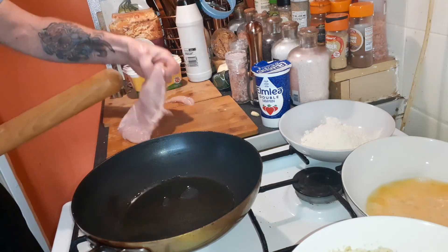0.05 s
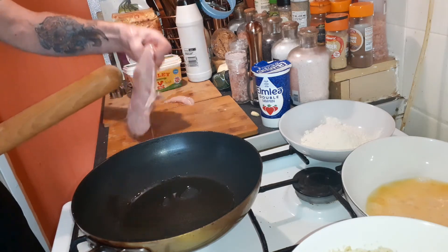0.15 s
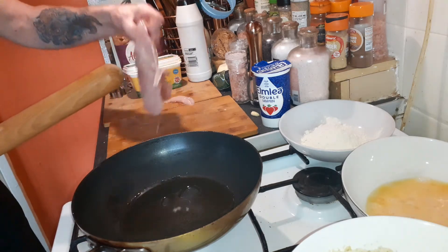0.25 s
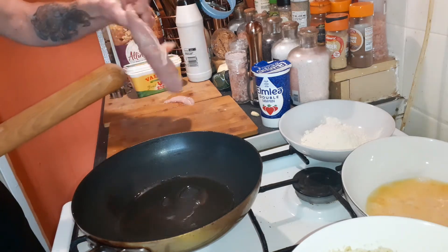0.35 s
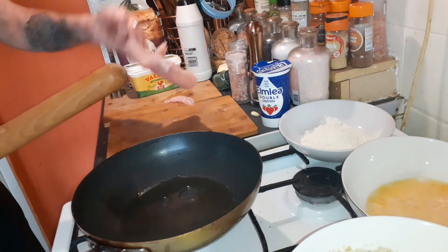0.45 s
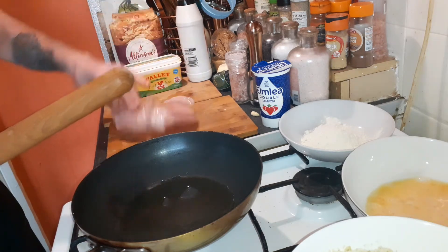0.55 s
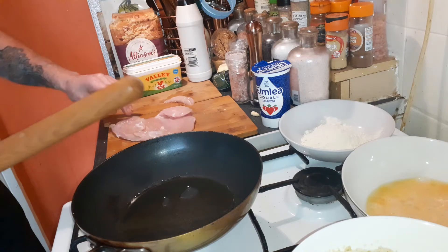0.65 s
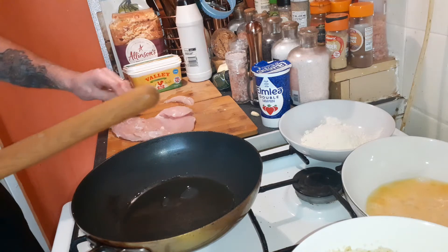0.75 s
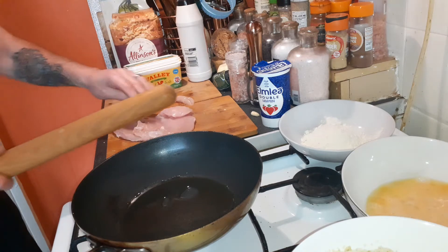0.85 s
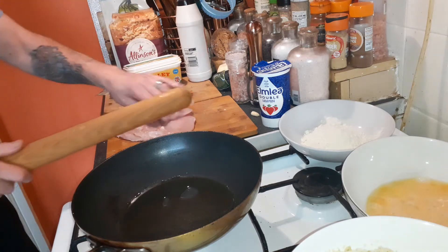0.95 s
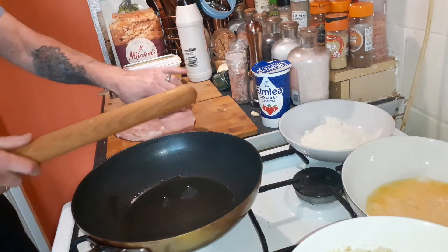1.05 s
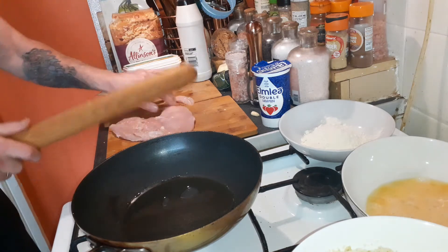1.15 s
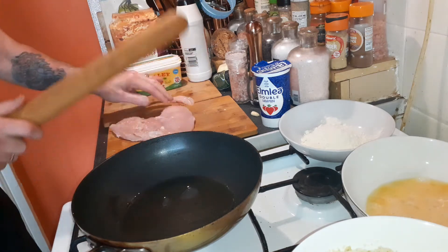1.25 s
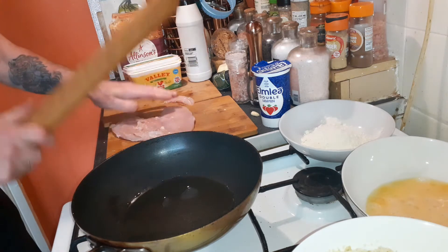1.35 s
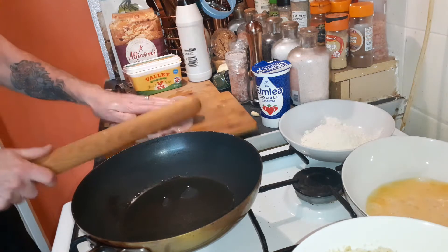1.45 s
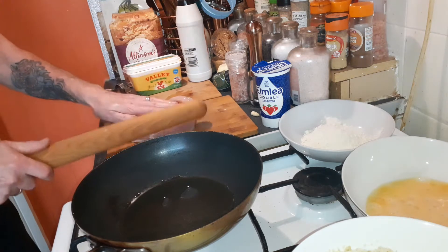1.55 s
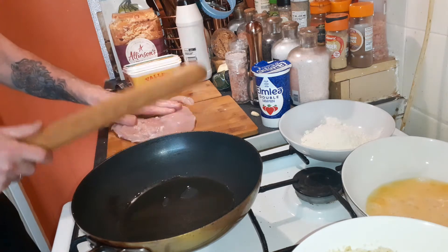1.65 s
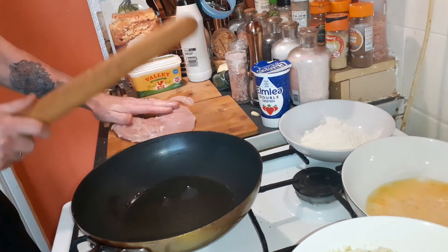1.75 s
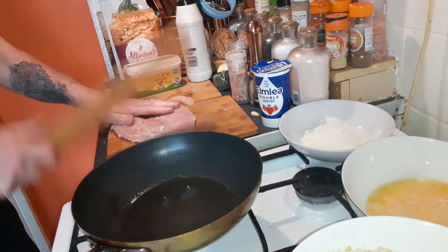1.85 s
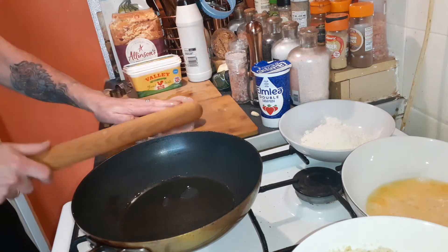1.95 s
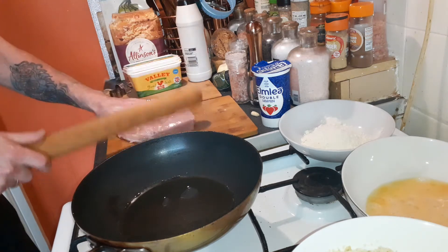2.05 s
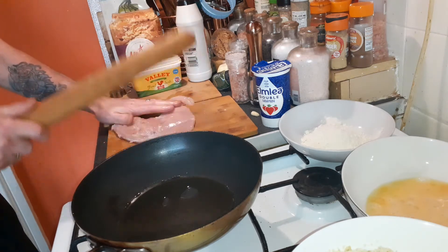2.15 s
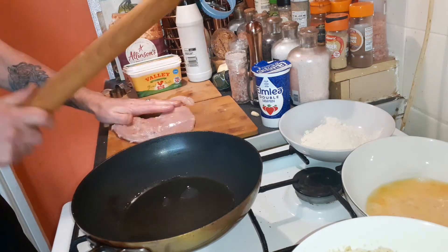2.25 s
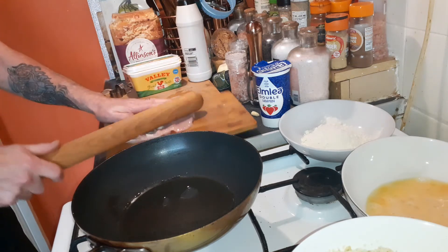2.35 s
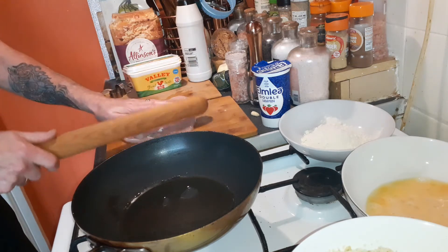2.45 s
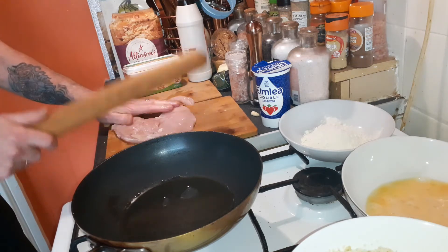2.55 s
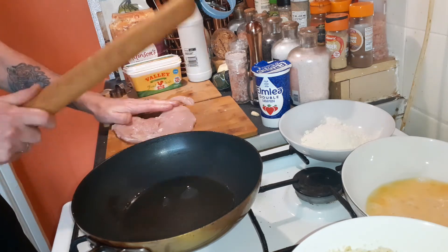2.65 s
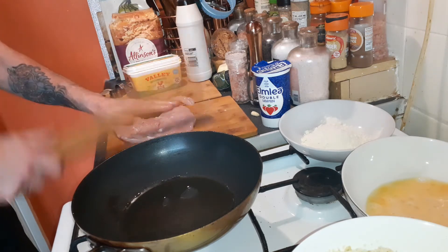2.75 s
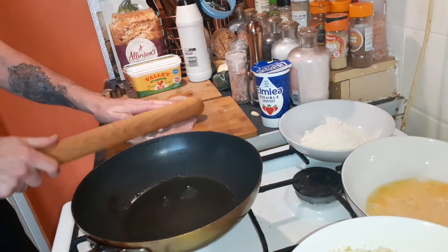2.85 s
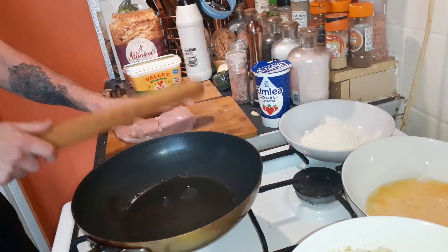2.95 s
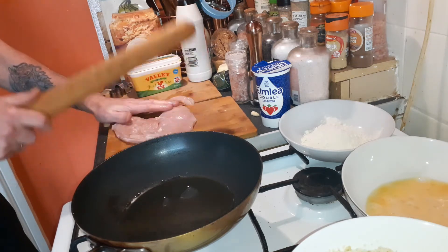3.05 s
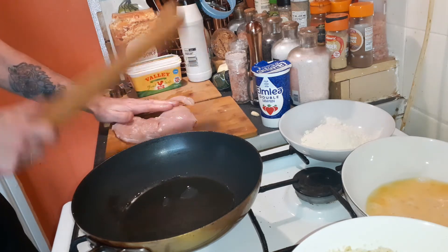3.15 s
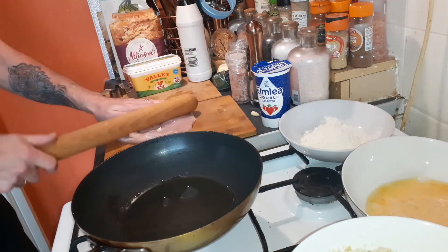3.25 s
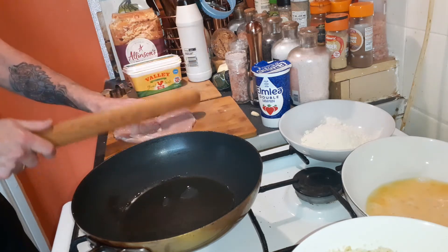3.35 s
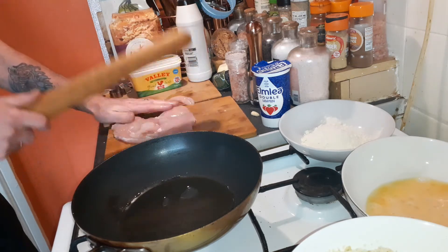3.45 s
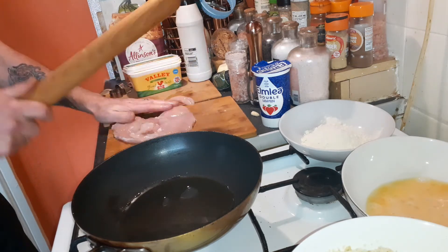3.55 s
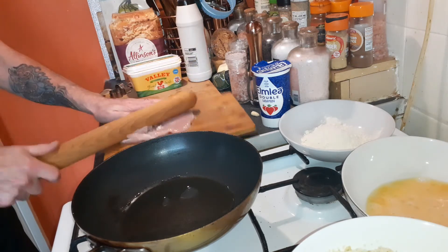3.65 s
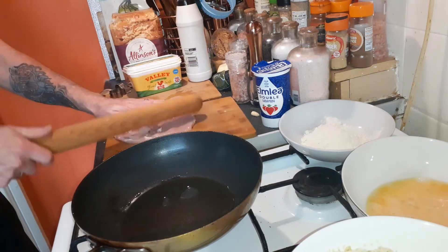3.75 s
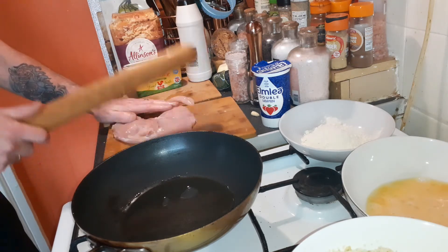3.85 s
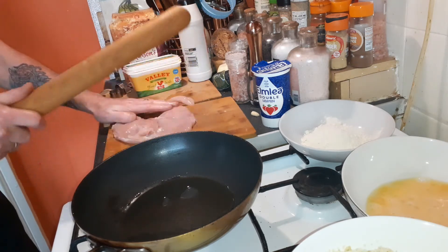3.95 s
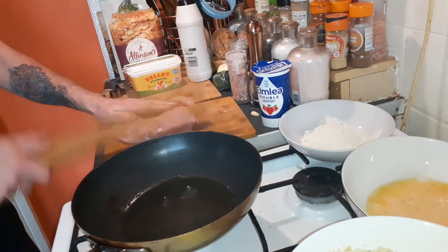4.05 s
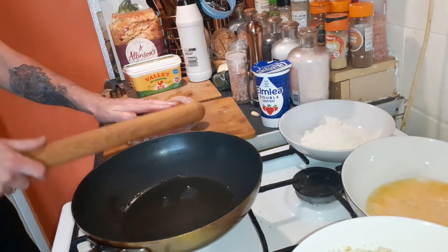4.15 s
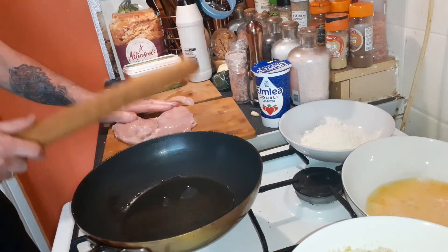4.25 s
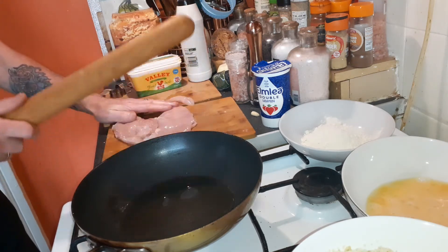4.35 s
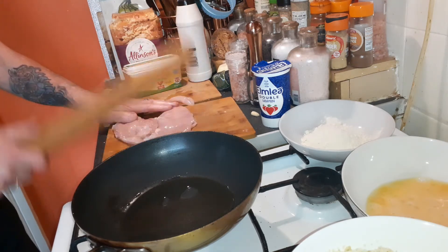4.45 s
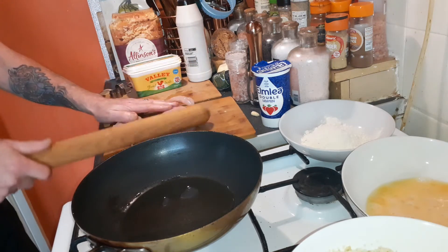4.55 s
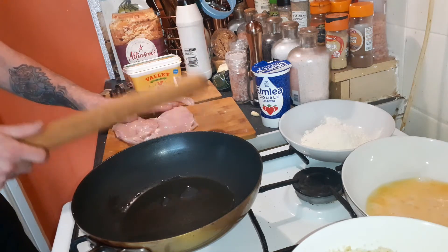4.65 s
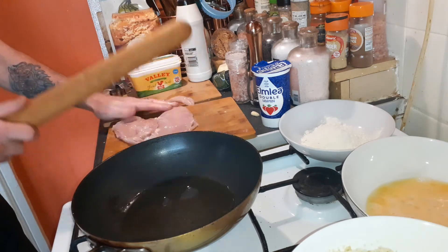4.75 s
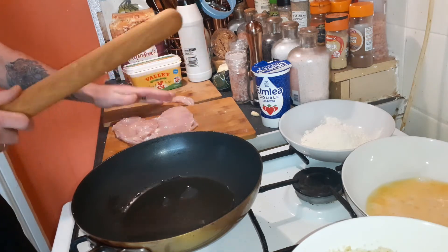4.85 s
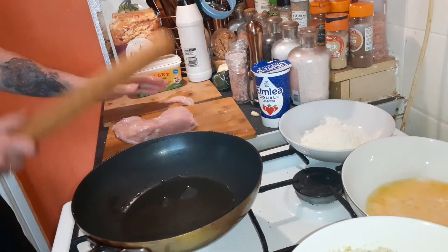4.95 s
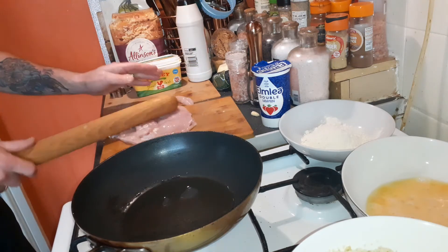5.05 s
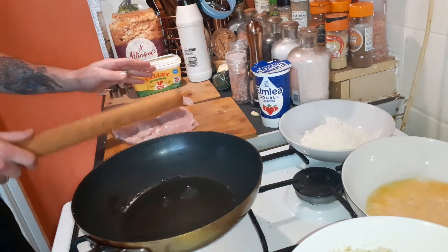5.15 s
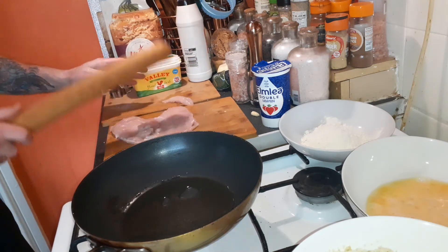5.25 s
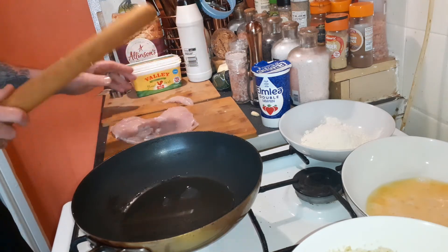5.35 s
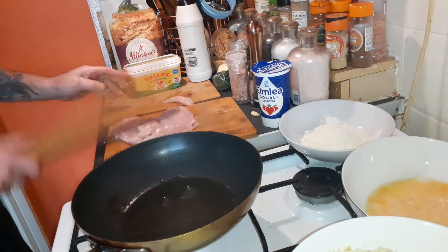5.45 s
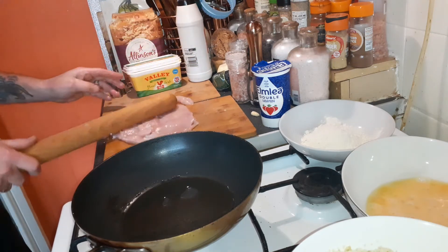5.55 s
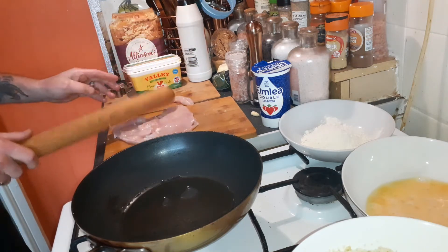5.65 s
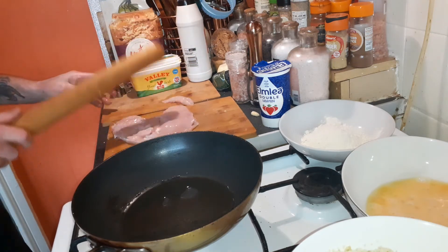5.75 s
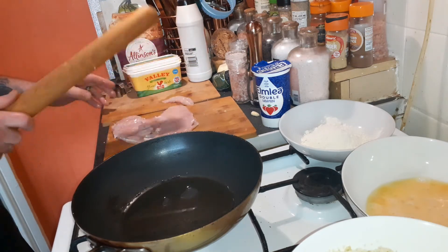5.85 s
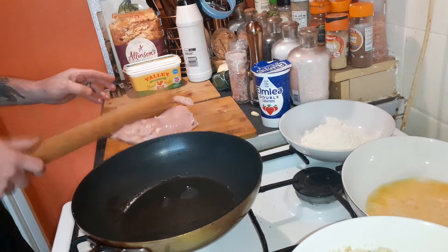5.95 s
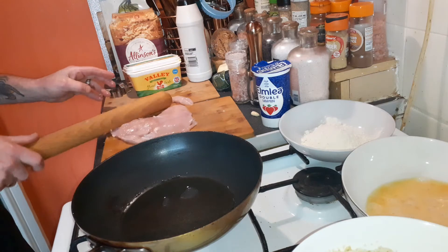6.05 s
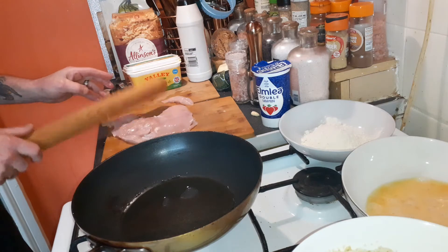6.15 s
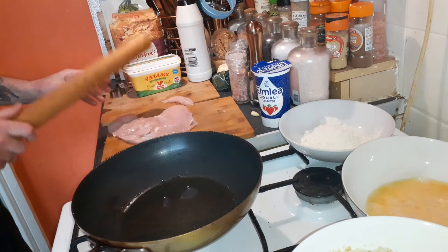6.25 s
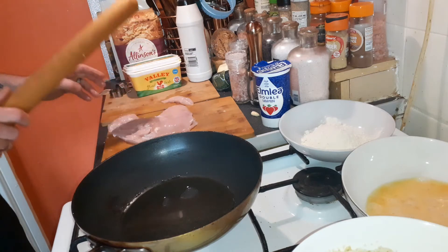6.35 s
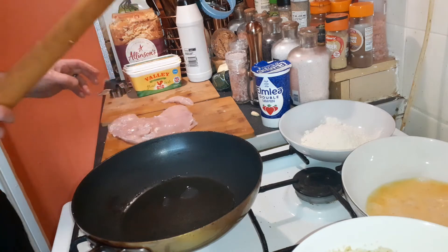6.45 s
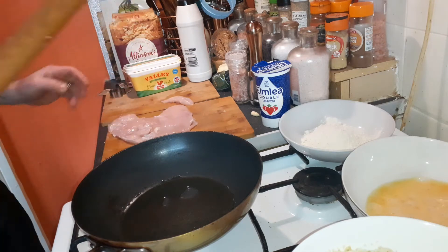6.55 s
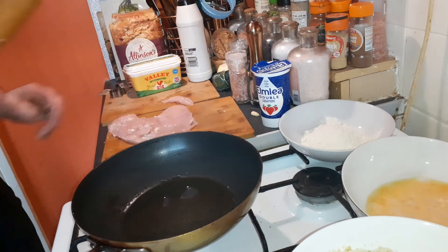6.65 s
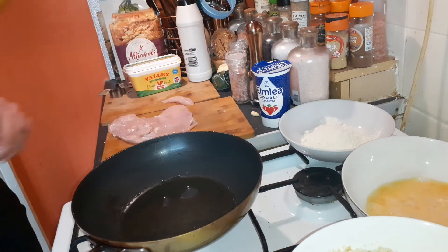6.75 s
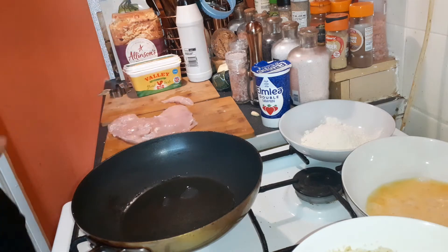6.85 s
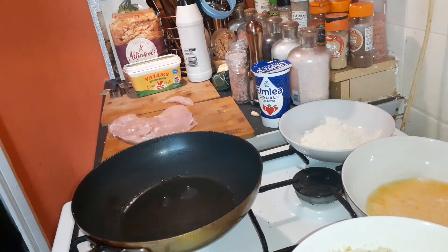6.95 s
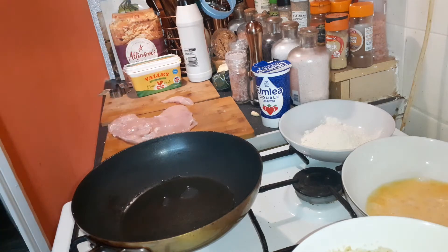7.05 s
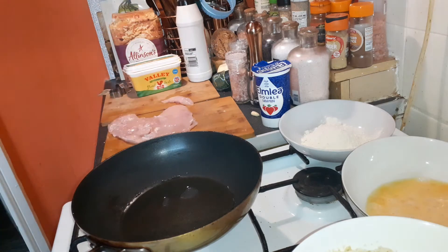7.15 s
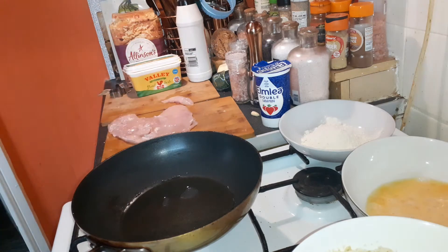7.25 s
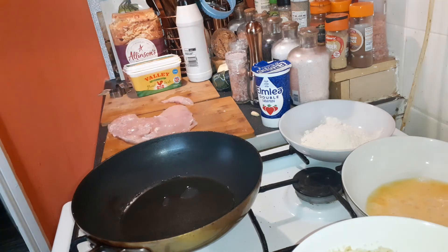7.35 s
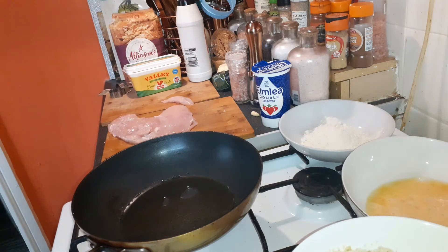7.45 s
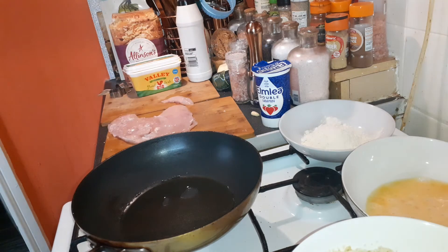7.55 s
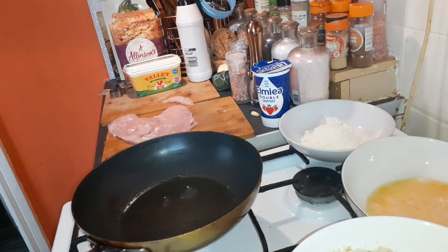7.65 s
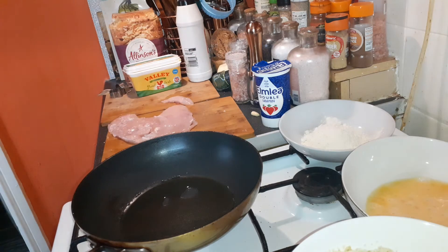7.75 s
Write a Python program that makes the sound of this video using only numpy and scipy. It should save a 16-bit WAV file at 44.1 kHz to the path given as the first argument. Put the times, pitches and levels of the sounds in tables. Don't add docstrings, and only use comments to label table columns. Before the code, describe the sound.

In a small tiled kitchen, raw chicken flops softly onto a wooden board, then a rolling pin beats it about twice a second. Each close, loud blow is a fleshy slap with a low thump, followed at once by the board clacking and rattling on the worktop. After the last blow, only faint brushes, a light tap and fridge hum with hiss remain. Close stereo microphones, slightly overloaded.

```python
import sys
import numpy as np
from scipy import signal
from scipy.fft import rfft, irfft, next_fast_len
from scipy.io import wavfile
from scipy.ndimage import uniform_filter1d

SR = 44100
rng = np.random.default_rng(int(sys.argv[2]) if len(sys.argv) > 2 else 0)


def gain_from_db(level_db):
    decades = np.asarray(level_db, float) / 20
    return 10 ** decades


def wav_record(signal):
    frames = np.transpose(np.atleast_2d(signal))
    bounded = np.clip(frames, -1, 1)
    quanta = np.round(bounded * 32767).astype(np.int16)
    wavfile.write(sys.argv[1], SR, quanta)


N = 343715

# [t/s, force/dB, weight into the board/dB, wetness
# of slap/dB, extra brightness/dB per octave]
BLOWS = [(0.607, -31, -13.5, 2, 4), (1.455, -6, -12.5, -10, -0.6), (1.914, -5, -11, -12.5, 2.5),
         (2.365, -5.5, -8.5, -10, 1), (2.8, -5.5, -10.5, -6, 0.5), (3.225, -4, -11.5, -8, 1),
         (3.668, -6.5, -9.5, -6, 1), (4.097, -6, -10.5, -9, 1.5), (4.52, -6.5, -11, -7.5, 0),
         (5.026, -13, -7, -8, 4), (5.495, -8, -5.5, -7, 0), (5.988, -12, -6, -1, -5.3)]
# [t/s, force/dB, weight/dB, crack/dB, extra brightness of a first wet touch/dB per octave
BOUNCES = [(2.422, -4, -16, -8), (2.851, -4, -15.5, -7), (3.278, -7, -16.5, -8), (3.721, -9, -12.5, -2.5),
           (4.149, -5.5, -14.5, -6), (4.575, -7, -11, -6), (5.071, -27.5, -4.5, 12),
           (5.08, -6.5, -20.5, -7), (5.094, -17, -3.5, -13.5), (5.54, -11.5, -10, -5.5),
           (5.574, -9.5, -12.5, -4.5), (5.677, -22.5, -10.5, -11.5), (6.025, -11.5, -12, -2.5),
           (0.613, -18.5, -13, -10.5), (5.981, -32.5, -5, 10.5, 6), (1.452, -41, -14.5, 11, 3),
           (1.519, -27.5, -16, 3.5), (1.532, -32.5, -12.5, 5.5)]
# [t/s, force/dB, weight/dB]
SETTLES = [(0.641, -29.5, 0.5), (1.475, -20.5, -2), (1.497, -9.5, -2.5), (1.517, -14.5, -9.5),
           (1.545, -18, -29), (1.954, -9.5, -7.5), (1.994, -13.5, -7.5), (2.454, -17, -16.5),
           (2.899, -20, -10.5), (3.319, -36, 10.5), (3.759, -10.5, -9.5), (4.199, -23.5, -17.5),
           (4.619, -24, -6), (5.123, -34, -14.5), (5.189, -47, -1), (5.609, -21.5, -41), (5.644, -28, 2),
           (6.048, -12.5, -10), (6.109, -33, -2)]
# [t/s, force/dB, weight/dB]
TAPS = [
    (1.112, -46, -12),
    (7.004, -63, 3.5),
    (7.094, -60.5, 3.5),
    (7.644, -47, -8),
]
# [t/s, low rumble/dB, hiss/dB, decay/s]
SHUFFLES = [
    (0.44, -79, -103, 0.0098),
    (0.588, -45, -49.5, 0.027),
    (1.12, -76, -69, 0.025),
    (6.22, -74.5, -84, 0.37),
    (6.537, -60, -54.5, 0.019),
    (7.03, -69, -98, 0.058),
    (7.42, -77, -83, 0.045),
    (7.689, -52.5, -56.5, 0.022),
]
# [f/Hz, level/dB, time to fade 60 dB/s]
WORKTOP = [(77, -23.5, 0.36), (101, 13, 0.079), (135.6, 0.5, 0.42), (159.3, 5.5, 0.21), (181.7, 6, .2)]
BOARD_LOW = [(241, -9, 0.04), (273.6, -8, 0.072), (332.8, -3.5, 0.066), (390.8, -2.5, 0.052),
             (476.6, -8, 0.044)]
BOARD_HIGH = [(561.3, 4, 0.027), (589, -6, 0.059), (692, -8.5, 0.051), (758, -8, 0.083), (836.2, -6, .07),
              (897, -2.5, 0.036), (1047, -2, 0.027), (1176, -21.5, .04), (1232, -8, 0.12),
              (1292, -3, 0.035), (1550, -10, 0.044), (1680, -13, 0.053), (1802, -0.5, 0.0065)]
# [f/Hz, level/dB, time to fade 60 dB/s]
LANDING = [(448, -5.5, 0.069), (602.4, -3.5, 0.057), (702, -5.5, .09), (853.4, -1.96, .07),
           (889, -4.5, 0.035), (1042, -7.5, 0.053), (1252, -13, 0.04), (1369, -13, .07), (1412, -13, 0.03),
           (1674, -13, .05), (1794, -10, 0.056)]
# [f/Hz, level/dB, time to fade 60 dB/s, held to 0.7 at most]
PAN = [(187, 2.5, 0.71), (270, -12, 2.5), (336, -12, 2.3), (406, -10.5, 1.9), (856, -7, 1.4),
       (1060, -21, 2.2)]
# [f/Hz, level/dB per Hz]
SLAP = [(200, -28.5), (500, -16), (900, -4.5), (1300, -1), (2500, -2), (4000, -4.5), (6000, -9),
        (9200, -14), (10000, -19.5), (15300, -24.5), (16800, -36)]
# [f/Hz, time to fade 60 dB/s]
ROOM_T60 = [(80, 0.44), (210, 0.34), (560, 0.27), (1470, 0.27), (3880, 0.27), (10200, 0.28)]
# [f/Hz, echo over direct sound/dB]
ROOM_DB = [(80, -2), (300, -5), (600, -4), (1500, 3.5), (4000, 1), (12000, -1.5)]
# [f/Hz, likeness/-1 to 1]
ALIKE = [(40, 1), (100, 1), (300, 0.79), (600, 0.6), (1500, 0)]
# [f/Hz, level/dB per Hz]
HISS = [(25, -37), (50, -17), (100, -9), (200, -18.5), (450, -20.5), (800, -23), (1400, -19), (2200, -33.5),
        (3500, -29), (5550, -30), (7000, -27), (10000, -34), (13600, -26), (16000, -28)]
# [f/Hz, width/Hz, level/dB]
WHISTLES = [(1180, 98, -75), (1420, 83, -78), (3080, 200, -84.5), (3970, 220, -77.5), (4344, 390, -86),
            (4720, 840, -77), (6340, 50, -81), (7340, 200, -92), (8970, 350, -75), (11310, 1200, -76),
            (12100, 200, -86.5), (14600, 350, -89.5), (15540, 200, -81)]
# [f/Hz, level/dB rms]
MAINS = [(50, -73), (100, -69), (150, -87), (200, -92)]
# [t/s, gain/dB]
GAIN = [(0, 2), (.3, -1), (.9, 7), (1.44, 8.5), (1.6, -0.6), (2.35, 2), (4.1, 2.1), (5.0, -0.4), (6.4, 1),
        (6.7, 0.5), (7.55, 5), (7.79, 9)]
# [f/Hz, right over left/dB]
RIGHT_DB = [(30, -5.5), (80, 7), (250, 3.5), (700, 1.5), (4000, 2.5), (9000, 2.5), (14000, -2.5)]

RING = 16384
HISS_TOP_HZ = 15720
WET_SPRAY_DB, DRY_SPRAY_DB = 1.5, -8


def blows(room):
    return knocks(BLOWS, room, BOARD_HIGH, lead_s=.0035, rise_s=.0015, contact_s=.008,
                  thump_db=-2.5, thud_db=-0.16, clack_db=-7, slap_db=-1.5,
                  share=1.48, tilt_db=3, spray_db=WET_SPRAY_DB)


def bounces(room):
    return knocks(BOUNCES, room, LANDING, lead_s=.0012, rise_s=.0002, contact_s=.007,
                  thump_db=-22.5, thud_db=-4.5, clack_db=-7, slap_db=-0.5,
                  share=0.23, tilt_db=1.14, spray_db=DRY_SPRAY_DB)


def settles(room):
    return knocks(SETTLES, room, BOARD_HIGH, lead_s=.003, rise_s=.002, contact_s=.012,
                  thump_db=-22.5, thud_db=-6.5, clack_db=-11, slap_db=-12.5,
                  share=1.84, tilt_db=-3.46, spray_db=DRY_SPRAY_DB)


def taps(room):
    return knocks(TAPS, room, BOARD_HIGH, lead_s=.004, rise_s=0.0022, contact_s=0.0082,
                  thump_db=-18.5, thud_db=-2.5, clack_db=-9.5, slap_db=-18,
                  share=-0.5, tilt_db=4, spray_db=DRY_SPRAY_DB)


def knocks(table, room, board, lead_s, rise_s, contact_s,
           thump_db, thud_db, clack_db, slap_db, share, tilt_db, spray_db):
    out = np.zeros((2, N + 2 * RING))
    t = np.arange(RING) / SR
    push = (1 - np.exp(-t / rise_s)) ** 3 * np.exp(-t / contact_s)
    click = 1. * (np.arange(RING) == np.argmax(push))
    for row in table:
        s, force_db, weight_db, wet_db, bright_db = np.pad(row, (0, 5 - len(row)))

        def colour(hz):
            tilt = (tilt_db + bright_db) * np.log2(hz / 4000 + 0.25)
            return gain_from_db(along(SLAP, hz) + tilt + spray_db * (hz > 9600))

        crack = causal(colour)
        stutter = push * gain_from_db(6.1 * np.minimum(rng.exponential(size=RING), 4))
        thump = peak(ring(push, WORKTOP), force_db + thump_db + share * weight_db)
        thud = peak(ring(push, BOARD_LOW), force_db + thud_db + weight_db)
        low = thump + thud
        clack = peak(ring(stutter ** 9.8, board), force_db + clack_db)
        spatter = stutter ** 1.8 * rng.standard_normal(RING)
        slap = peak(shape(spatter, crack), force_db + slap_db + wet_db)
        even = level(shape(click, crack), 0) * np.std(slap)
        low, clack, slap, even = np.pad([low, clack, slap, even], ((0, 0), (0, RING)))
        start = int((s - lead_s) * SR)
        heard = kitchen([low, clack, slap], room, lag_share=(.3, .6, 1), send=low + clack + even)
        out[:, start:start + 2 * RING] += heard
    return out[:, :N]


def ring(push, modes):
    t = np.arange(RING) / SR
    hz, db, t60 = np.transpose(modes)[:, :, None]
    chance = rng.standard_normal((3, len(modes), 1))
    longest = 42 / hz + .02
    fade = gain_from_db(db + 2 * chance[1] - 60 * t / np.minimum(t60, longest))
    tones = np.sin(2 * np.pi * hz * (1 + .01 * chance[0]) * t + .4 * chance[2])
    return (tones * fade).sum(axis=0) * np.cumsum(push)


def pan():
    out, t = np.zeros(N + 2 * RING), np.arange(2 * RING) / SR
    hz, db, t60 = np.transpose(PAN)[:, :, None]
    swell = 1 - np.exp(-t / 0.0067)
    for s, force_db, *_ in BLOWS:
        chance = rng.standard_normal((2, len(PAN), 1))
        fade = gain_from_db(db + 2 * chance[0] - 60 * t / np.minimum(t60, .7))
        tones = fade * np.sin(2 * np.pi * (hz * t + chance[1]))
        out[int(s * SR):][:2 * RING] += peak(tones.sum(axis=0) * swell, force_db - 41)
    return out[:N]


def shuffles():
    t, (low, hiss) = np.arange(N) / SR, np.zeros((2, N))
    for s, low_db, hiss_db, decay in SHUFFLES:
        age = np.maximum(t - s, 0)
        swell = (1 - np.exp(-age / 0.0164)) * np.exp(-age / decay)
        low = low + gain_from_db(low_db) * swell
        hiss = hiss + gain_from_db(hiss_db) * swell
    rumble = shape(rng.standard_normal(N), lambda hz: (hz / 250) / (1 + (hz / 500) ** 3))
    cloth = shape(rng.standard_normal(N), lambda hz: (hz / 1500) / (1 + (hz / 3500) ** 2.5))
    return low * level(rumble, 7.3) + hiss * level(cloth, 10.7)


def fridge():
    t = np.arange(N) / SR
    hiss = level(shape(diffuse(N), lambda hz: gain_from_db(along(HISS, hz))), -68)
    out = hiss * gain_from_db(.5 * walk(7.9))
    for hz, width, db in WHISTLES:
        whistle = shape(diffuse(N), lambda f: 1 / (1 + ((f - hz) / (width / 2)) ** 2))
        out = out + level(whistle, db) * gain_from_db(1.8 * walk(5))
    for hz, db in MAINS:
        loudness = np.sqrt(2) * gain_from_db(db + .7 * walk(9))
        out = out + loudness * np.sin(2 * np.pi * hz * t + 0.26 * walk(3.6))
    out = shape(out, lambda hz: hz < HISS_TOP_HZ)
    return out * gain_from_db(np.interp(t, *np.transpose(GAIN)))


def kitchen(direct, room, lag_share, send):
    bands, fades = room
    shift, place = rng.random(2)
    tail = (np.roll(bands, int(shift * RING), axis=2) * fades).sum(axis=0)
    lag_s = 0.000435 * (.5 + place)
    late = sum(np.roll(x, int(share * lag_s * SR)) for x, share in zip(direct, lag_share))
    echo = signal.fftconvolve(send[None], tail, axes=1)[:, :len(send)]
    return np.array([sum(direct), late]) + echo


def walls():
    t, centres = np.arange(RING) / SR, 50 * 2. ** np.arange(9)
    noise = shape(diffuse(RING), lambda hz: hz < HISS_TOP_HZ)

    def octave(hz):
        return lambda f: np.cos(np.pi / 2 * np.clip(np.log2((f + 1) / hz), -1, 1)) ** 2

    bands = [shape(noise, octave(hz)) for hz in centres]
    build_up = np.clip((t - .002) / 0.0051, 0, 1)
    fades = gain_from_db(-60 * t / along(ROOM_T60, centres)[:, None]) * build_up
    fades *= (gain_from_db(along(ROOM_DB, centres)) / np.sqrt(np.sum(fades ** 2, axis=1)))[:, None]
    return np.array(bands), fades[:, None]


def diffuse(size):
    mid, side = rng.standard_normal((2, size))
    alike = lambda hz: np.clip(along(ALIKE, hz), -1, 1)
    mid = shape(mid, lambda hz: np.sqrt((1 + alike(hz)) / 2))
    side = shape(side, lambda hz: np.sqrt((1 - alike(hz)) / 2))
    return np.array([mid + side, mid - side])


def walk(rate):
    k = int(SR / rate)
    steps = np.repeat(rng.standard_normal(N // k + 1), k)
    return 1.3 * uniform_filter1d(uniform_filter1d(steps, k), k)[:N]


def level(x, db):
    return x * gain_from_db(db) / np.sqrt(np.mean(x ** 2))


def peak(x, db):
    return x * gain_from_db(db) / np.sqrt(uniform_filter1d(x ** 2, size=256).max())


def along(table, hz):
    points, values = np.transpose(table)
    return np.interp(np.log(hz + 1), np.log(points), values)


def shape(x, gain):
    size = 2 * next_fast_len(x.shape[-1] // 2 + 1)
    return irfft(rfft(x, size) * gain(np.fft.rfftfreq(size, 1 / SR)), size)[..., :x.shape[-1]]


def causal(gain):
    def response(hz):
        cepstrum = irfft(np.log(gain(hz) + 1e-6))
        half = cepstrum.shape[-1] // 2
        cepstrum[..., 1:half] *= 2
        cepstrum[..., half + 1:] = 0
        return np.exp(rfft(cepstrum))
    return response


def scene():
    room = walls()
    pounding = blows(room) + bounces(room) + settles(room) + taps(room)
    brushes = shuffles()
    handling = kitchen([brushes], room, lag_share=[1], send=brushes)
    return pounding + handling + pan() + fridge()


def band_limit(x):
    return signal.sosfilt(signal.butter(12, 16990, fs=SR, output="sos"), x)


def record(dry):
    def ports(hz):
        balance = gain_from_db(np.outer([-.5, .5], along(RIGHT_DB, hz)))
        bass_cut = 1 / (1 + (58 / (hz + 1)) ** 4)
        top_cut = 1 / (1 + (hz / 16200) ** 90)
        return balance * bass_cut * top_cut

    heard = shape(dry, causal(ports))
    return band_limit(np.tanh(1.18 * heard))


dry = scene()
out = record(dry)
wav_record(out)
```